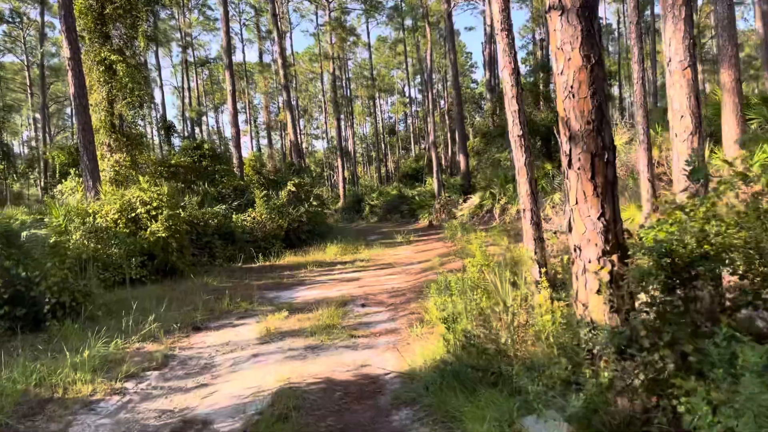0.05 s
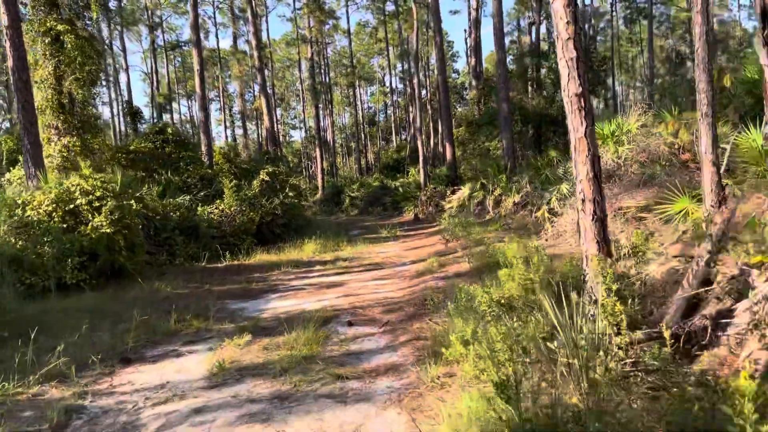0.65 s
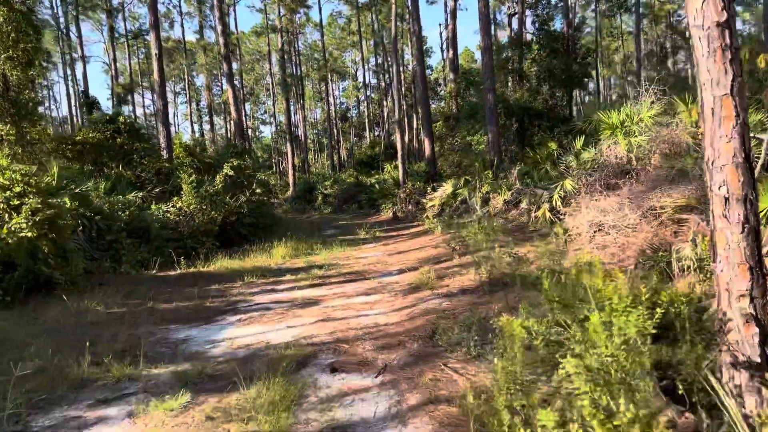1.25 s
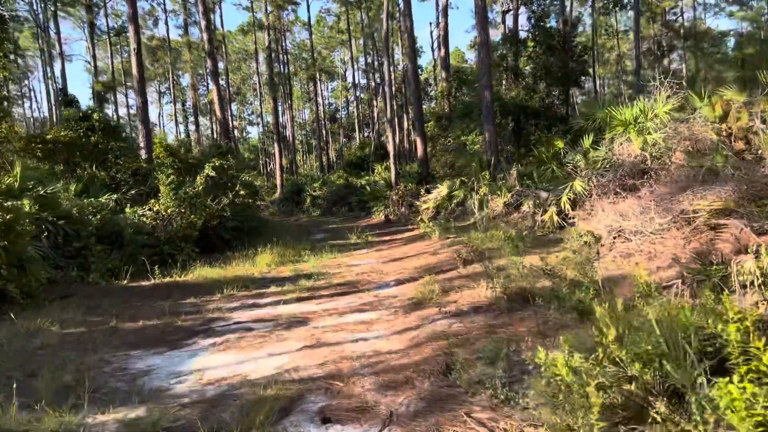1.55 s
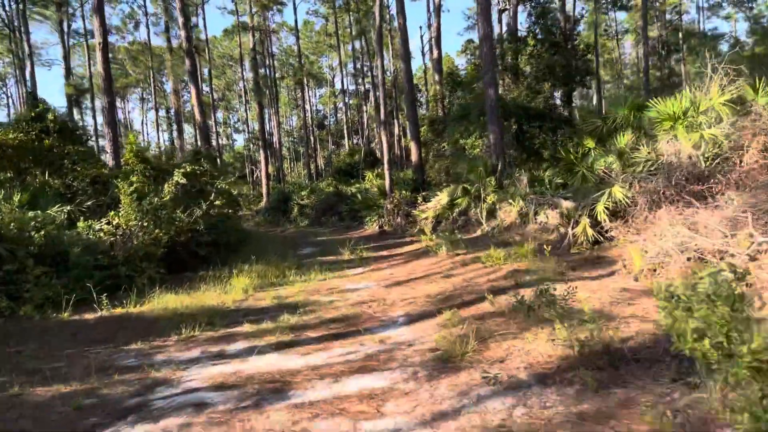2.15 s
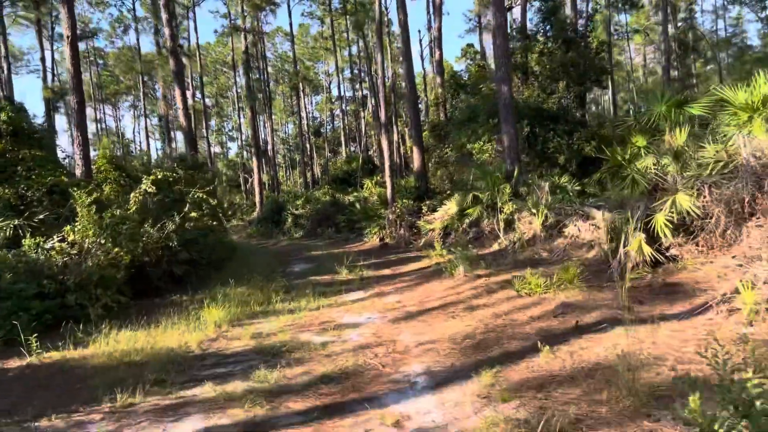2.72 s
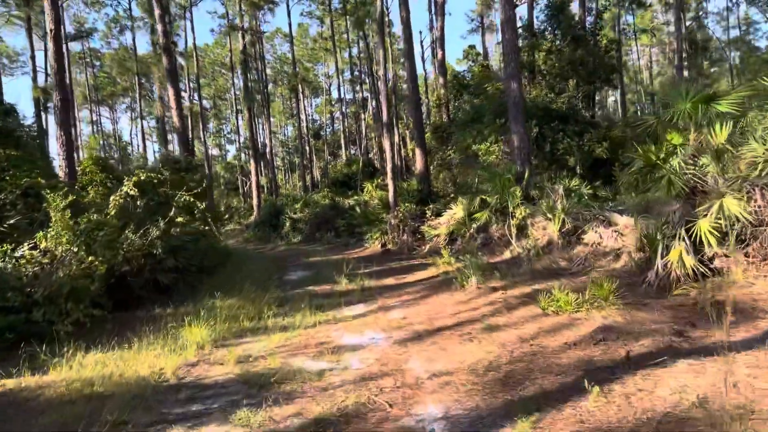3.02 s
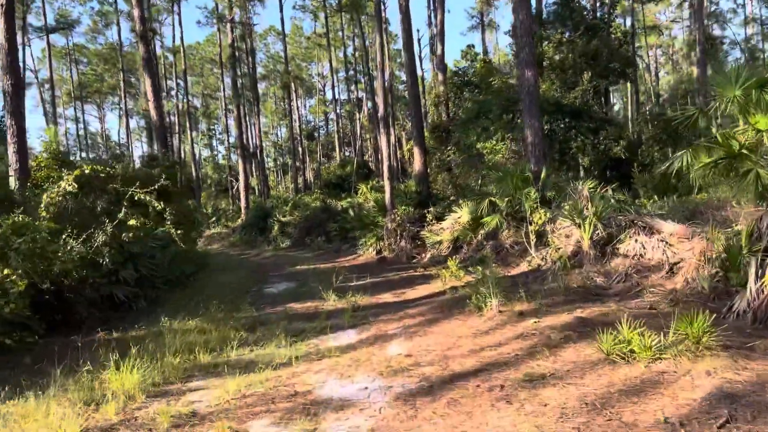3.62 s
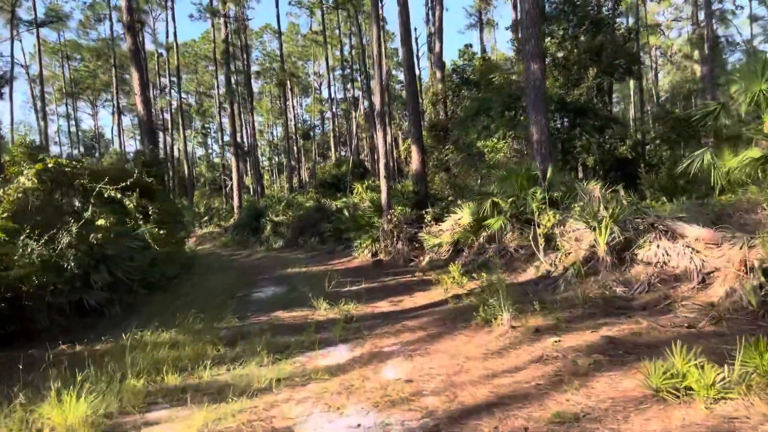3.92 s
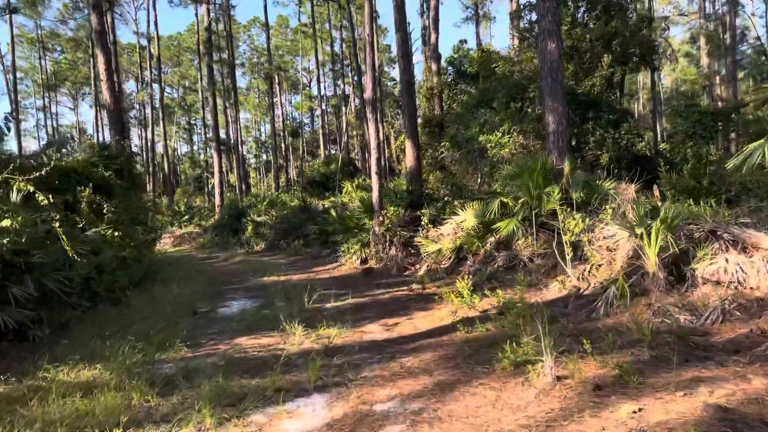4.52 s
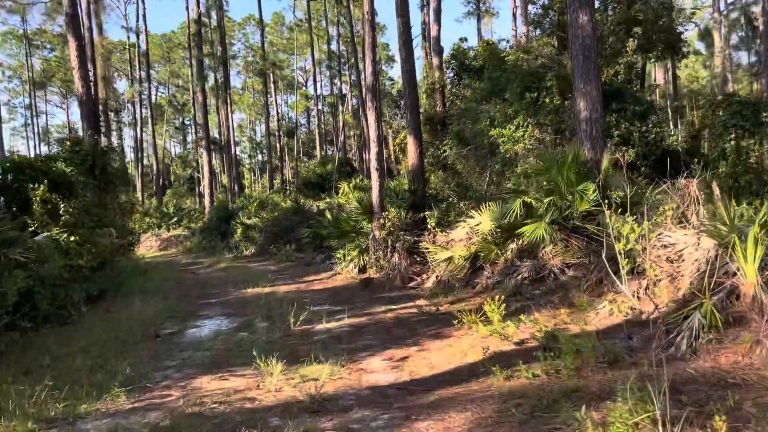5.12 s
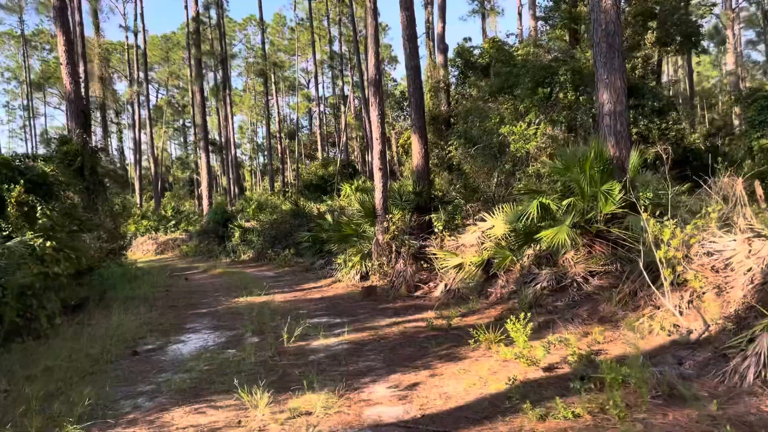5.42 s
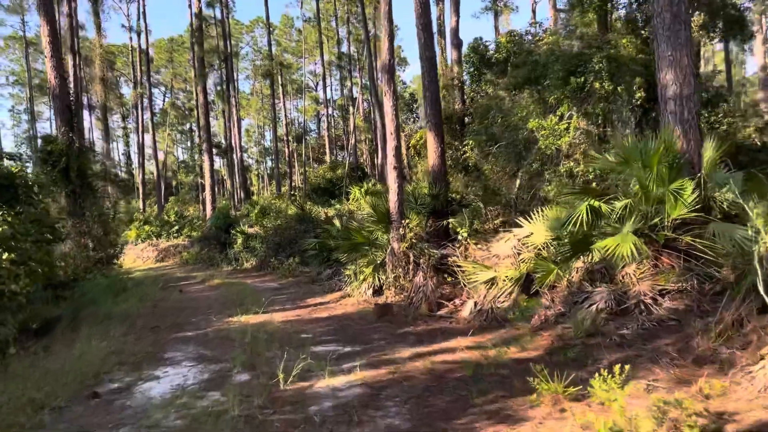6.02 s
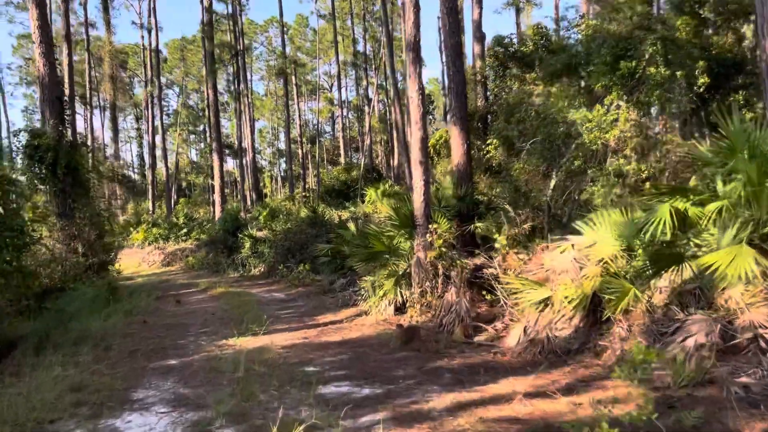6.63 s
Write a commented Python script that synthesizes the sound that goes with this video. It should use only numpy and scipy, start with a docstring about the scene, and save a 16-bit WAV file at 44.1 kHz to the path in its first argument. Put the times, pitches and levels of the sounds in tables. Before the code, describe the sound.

Low wind buffeting and tyres crunching on sand, as a light vehicle bumps along, a loose part scraping and clacking and twigs cracking.

```python
"""A light vehicle, probably a bicycle, rolls slowly along a sandy forest track, microphone on board.
From the start, air buffets the microphone and the tyres crunch over sand and pine needles.
Bumps thud through the frame; a loose part scrapes upward and drops back with a clack, again and again.
Twigs snap in the first second, then from 2.2 to 3.4 s amid more bumps, coarse grit and metal ticks.
From 4 to 6 s come the hardest bump and the hardest landings, which also thud; the ride then eases."""
import sys
import numpy as np
from scipy import signal
from scipy.fft import rfft, irfft
from scipy.io import wavfile
from scipy.ndimage import uniform_filter1d

SR = 44100
rng = np.random.default_rng(int(sys.argv[2]) if len(sys.argv) > 2 else 0)


def waveform_to_disk(signal):
    """Save audio, clipped to [-1, 1], as 16-bit WAV at the path in sys.argv[1]."""
    frames = np.transpose(np.atleast_2d(signal))
    scaled = np.clip(frames, -1, 1) * 32767
    samples = np.round(scaled).astype(np.int16)
    wavfile.write(sys.argv[1], SR, samples)


N = 302570
TIME_S = np.arange(N) / SR
FREQS_HZ = np.arange(N // 2 + 1) * SR / N
TOP_HZ = 15750

# Air on the microphone between jolts. Each row: time in seconds, level in dB.
AIR_LEVELS = [(0.0, -39.5), (0.42, -35.5), (0.61, -45), (0.94, -43), (1.49, -39.5), (1.9, -37),
              (2.27, -38.5), (2.67, -45), (3.55, -39), (4.1, -38.5), (4.89, -39), (5.2, -39), (5.37, -40),
              (6.04, -45.5), (6.42, -39.5), (6.86, -47)]
# Sand off the tread. Each row: time in seconds, level in dB.
SPRAY_LEVELS = [(0.0, -68), (0.57, -64.5), (0.8, -67.5), (2.14, -62.5), (2.33, -66.5), (2.81, -67),
                (3.17, -69.5), (3.78, -71), (3.95, -69), (4.62, -67.5), (5.24, -70.5), (6.48, -67.5),
                (6.86, -64)]
# Ground under the tyres. Each row: time in seconds, roll level in dB, grit level in dB.
GROUND_LEVELS = [(0.0, -45.5, -52.5), (0.63, -45.5, -54), (1.45, -43.5, -47.5), (1.62, -45, -55),
                 (1.95, -43, -53.5), (2.44, -44.5, -50.5), (2.77, -42, -44.5), (3.13, -43.5, -52),
                 (3.88, -44, -51), (4.51, -43, -47.5), (5.44, -44.5, -54), (5.73, -43.5, -47.5),
                 (6.31, -45.5, -48.5), (6.86, -47, -50)]
# Patches on the track. Each row: centre in seconds, level in dB, length in seconds.
NEEDLE_PATCHES = [(0.48, -56.5, 0.11), (0.645, -54.5, 0.22), (1.229, -52, 0.12), (1.36, -58, 0.23),
                  (1.512, -62, 0.051), (1.685, -54, 0.081), (1.93, -52, 0.18), (2.263, -53, 0.066),
                  (2.335, -49, 0.028), (2.469, -51.5, 0.026), (3.515, -52.5, 0.042), (3.672, -54, 0.26),
                  (3.835, -55.5, 0.2), (3.956, -51, 0.022), (4.317, -61.5, 0.037), (6.61, -53.5, 0.084),
                  (6.689, -47, 0.03), (6.826, -44.5, 0.023)]
GRIT_PATCHES = [(1.28, -46, 0.12), (1.5, -51, 0.26), (1.906, -49, 0.097), (2.591, -40.5, 0.058),
                (2.675, -45, 0.12), (2.795, -46, 0.054), (2.904, -44.5, 0.049), (3.10, -42, 0.13),
                (3.305, -45, 0.12), (3.38, -47, 0.057), (3.443, -47, 0.035), (3.624, -46.5, 0.035),
                (3.788, -45.5, 0.043), (4.054, -44.5, 0.039), (4.919, -40, 0.027), (6.601, -42, 0.035)]
# Small contacts. Each row: start in seconds, level in dB.
DRY_CLICKS = [(0.5045, -37), (2.983, -38), (2.992, -22), (3.022, -37.5), (3.36, -40), (3.903, -39),
              (4.046, -32.5), (4.783, -34.5), (4.805, -30), (5.422, -29), (5.487, -35), (5.671, -51),
              (5.796, -32), (5.879, -27), (5.917, -34), (5.951, -36)]
METAL_TICKS = [(2.11, -21), (2.69, -32.5), (2.77, -30.5), (2.844, -31), (2.863, -27), (2.874, -26.5),
               (3.062, -37), (3.359, -34.5), (3.643, -50), (3.666, -38), (3.694, -28.5), (4.12, -30.5),
               (4.706, -29), (5.349, -34), (5.506, -22), (5.636, -31), (5.972, -34), (6.086, -35.5),
               (6.274, -35.5), (6.686, -44)]
# Twigs and cones breaking. Each row: start in seconds, level in dB, pitch in Hz, decay in cycles.
TWIG_SNAPS = [(0.147, -30, 1120, 4.8), (0.588, -19, 1130, 1.3), (0.686, -28, 785, 2.8),
              (2.242, -23.5, 1180, 2.2), (2.522, -35, 925, 2), (2.55, -25, 1220, 1.5),
              (2.757, -25, 1000, 1), (2.961, -22, 890, 1.5), (2.988, -20, 1190, 2.9),
              (3.244, -23.5, 1230, 2.6), (3.408, -26, 1230, 2.2), (3.427, -16.5, 1470, 2.3)]
# Thuds in the frame, from bumps and from the loose part's hardest landings.
# Each row: start in seconds, level in dB, pitch in Hz, knock offset in dB.
FRAME_THUDS = [(0.101, -19.5, 112, -3), (0.259, -29, 102, -7), (0.304, -21.5, 190, -12),
               (0.48, -27.5, 175, -19), (0.509, -13.5, 147, -6), (0.546, -19.5, 94, -4),
               (1.997, -18.5, 122, -27), (2.078, -19.5, 119, -19), (2.181, -21.5, 157, -7),
               (2.277, -28, 109, -12), (2.404, -24, 95, -7), (2.487, -23, 58.7, -32),
               (2.67, -27.5, 80, -3.5), (2.708, -25.5, 171, -20), (2.831, -14, 117, -15),
               (2.852, -24.5, 115, -29), (2.895, -25, 180, -16), (4.173, -21.5, 184, 0),
               (4.246, -18.5, 97, -7), (4.31, -19.5, 108, -22), (4.467, -16, 94, -1.5),
               (4.576, -17, 109, -28), (4.688, -22, 101, -15), (4.86, -21, 320, -20),
               (5.166, -23.5, 119, -14), (5.371, -18.5, 127, -25), (5.512, -9, 114, -18.5),
               (5.533, -21, 249, -6), (5.56, -25, 130, -12), (5.589, -17.5, 131, -16),
               (5.706, -26.5, 170, -5), (5.725, -20.5, 430, -2), (5.747, -20, 95, -14),
               (5.789, -22, 78.5, -24), (6.51, -22, 89.5, -20)]
# Hops of the loose part. Each row: start in seconds, scrape in dB, flight in seconds, clack in dB.
PART_HOPS = [(0.338, -31, 0.019, -43.5), (0.831, -25.5, 0.019, -40.5), (0.971, -25, 0.02, -34.5),
             (2.109, -33.5, 0.023, -42), (2.523, -28.5, 0.023, -40.5), (2.625, -34.5, 0.017, -47),
             (2.770, -27.5, 0.016, -43), (2.969, -33, 0.017, -32.5), (3.234, -31, 0.017, -38.5),
             (3.399, -31.5, 0.016, -41), (3.556, -35.5, 0.017, -41), (4.205, -26, 0.019, -31.5),
             (4.497, -28.5, 0.028, -39.5), (4.627, -31, 0.017, -47), (4.8184, -20.5, 0.025, -19.5),
             (4.911, -35, 0.024, -52), (4.9583, -25.5, 0.023, -31), (5.1056, -22.5, 0.021, -31.5),
             (5.199, -33, 0.023, -43), (5.3867, -21.5, 0.023, -31.5), (5.5247, -20, 0.017, -31.5),
             (5.6988, -21, 0.026, -24.5), (5.766, -30, 0.02, -49), (5.851, -21.5, 0.029, -29),
             (6.002, -25.5, 0.021, -52), (6.138, -27.5, 0.019, -54), (6.304, -26, 0.017, -39),
             (6.454, -32, 0.017, -40.5)]

# Noise spectra. Each row: frequency in Hz, relative density in dB.
WIND_SPECTRUM = [(22, -29), (40, -4.5), (65, 2), (120, 2), (200, -7), (300, -17.5), (600, -32), (1500, -44)]
SAND_SPECTRUM = [(1500, -4), (2500, 0.5), (4000, -2), (6000, 0.5), (8000, 3), (10000, 1), (12500, -11),
                 (14000, -1.5), (15500, 10)]
NEEDLE_SPECTRUM = [(2000, -3), (4000, -6.5), (6000, 2), (8000, 2.5), (10000, 5), (12500, -2), (14000, -4),
                   (15500, -20)]
ROLL_SPECTRUM = [(120, -7), (250, -5.5), (380, 1.5), (550, -6.5), (800, -7.5), (1200, -18.5), (2500, -26)]
GRIT_SPECTRUM = [(500, -3.5), (900, -1), (1300, 1.5), (2000, -10), (3000, -16.5), (5000, -20.5)]
DRY_CLICK_SPECTRUM = [(600, -59), (1400, -7), (2500, 3), (3800, 8.5), (5500, 1), (8000, -7), (14000, -37)]
TICK_SPECTRUM = [(2000, -4.5), (4500, -4), (6500, 3.5), (8000, -13), (10000, 1), (12500, -2.5),
                 (15500, -12)]
CRACK_SPECTRUM = [(300, 3), (900, 2), (2000, -5), (4000, -27), (10000, -42)]
KNOCK_SPECTRUM = [(100, -7), (220, 4.5), (380, -1), (520, -1.5), (800, -37), (2000, -65)]
RASP_SPECTRUM = [(500, 7.5), (900, 5), (1400, -3.5), (1800, 5.5), (2400, -2), (3300, -0.5), (4200, 8),
                 (5100, -5.5), (6500, -3.5), (7400, -11.5), (9000, -75), (12000, -33)]
EDGE_SPECTRUM = [(3000, -18), (6500, 10), (9500, 2), (11500, -9.5), (13000, -16), (15500, -19)]
CLACK_SPECTRUM = [(300, -7), (450, 7.5), (650, -2.5), (870, -2), (1200, 5.5), (1600, -14.5), (3000, -15)]
CONTACT_SPECTRUM = [(1000, -22), (1600, -10), (2200, -2.5), (3700, 9), (5000, -0.5), (6500, 4.5),
                    (9000, -16), (12000, -16), (15000, -38)]

# Resonances. Each row: frequency in Hz, bandwidth in Hz, relative level in dB.
METAL_MODES = [(2240, 14, -10.5), (2530, 24, -14), (2740, 21, -14), (3080, 28, -6.5), (4310, 60, -12),
               (5130, 58, -4), (5370, 60, -4), (9320, 140, 6.5), (11150, 71, -6.5)]
FRAME_MODES = [(179.2, 18, -0.5), (246, 44, -5)]
LOOSE_PART_MODES = [(1786, 40, 17.5), (2890, 240, 11.5), (3700, 680, -3), (4160, 200, -2), (5460, 370, 7.5)]
HOLLOW_SEAT_MODES = [(318, 21, -15), (492, 52, -16), (652, 22, -8.5), (782, 17, -2), (874, 28.4, 1),
                     (1075, 67, 3), (1234, 64, -4), (1746, 50, 1)]

# Phase between the microphone ports. Each row: frequency in Hz, lead of the left port in radians.
PORT_LEAD = [(0, 0), (700, .4), (2000, .1), (5000, .3), (6300, -.4), (7200, -1.7), (7800, -3.05),
             (8900, -3.25), (10000, -5.1), (11000, -6.2), (12700, -6.5), (14000, -9.35), (16000, -9.45)]

MID_CONTACT_DB = -27  # harder scrapes and clacks are brighter, softer ones duller


def undb(db):
    """Decibels to gain."""
    return 10 ** (np.asarray(db) / 20)


def unit(x):
    """Scale to rms 1."""
    return x / np.sqrt(np.mean(x ** 2))


def pan(x, left_db):
    """Lean a sound to the left."""
    return x * undb(np.array([[left_db], [-left_db]]) / 2)


def add(track, start_s, sound):
    """Mix a short sound into a track."""
    start = max(int(start_s * SR), 0)
    part = sound[..., :N - start]
    track[..., start:start + part.shape[-1]] += part


def fade(t, rise_s, decay_s):
    """Contact envelope, zero before onset."""
    t = np.maximum(t, 0)
    return (1 - np.exp(-t / rise_s)) * np.exp(-t / decay_s)


def curves(rows):
    """Level columns, linearly interpolated over time."""
    s, *columns = np.transpose(rows)
    return [np.interp(TIME_S, s, column) for column in columns]


def swells(rows):
    """One smooth rise and fall of gain per patch."""
    gain = np.zeros(N)
    for centre_s, db, length_s in rows:
        add(gain, centre_s - length_s / 2, undb(db) * np.hanning(int(length_s * SR)))
    return gain


def wander(rate_hz):
    """Random steps, smoothed twice; rms 1."""
    hold = int(SR / rate_hz)
    steps = np.repeat(rng.standard_normal(N // hold + 1), hold)
    return unit(uniform_filter1d(uniform_filter1d(steps, hold), hold)[:N])


def stereo_noise(side_db, size=N):
    """Noise at two ports: a shared part plus a difference."""
    mid, side = rng.standard_normal((2, size))
    return unit(np.array([mid + undb(side_db) * side, mid - undb(side_db) * side]))


def colour(x, spectrum, skirt_db_per_oct=24, size=2048):
    """Minimum-phase filter of unit energy; falls off beyond the spectrum's ends."""
    hz, db = np.transpose(spectrum)
    octave, known = np.log2(np.arange(size + 1) * SR / (2 * size) + 1), np.log2(hz)
    beyond_oct = np.abs(octave - np.clip(octave, known[0], known[-1]))
    gain_db = np.interp(octave, known, db) - skirt_db_per_oct * np.minimum(beyond_oct, 2)
    cepstrum = irfft(np.log(undb(gain_db)))
    cepstrum[1:size] *= 2
    cepstrum[size + 1:] = 0
    response = irfft(np.exp(rfft(cepstrum)))[:size]
    return signal.oaconvolve(x, response[None] / np.linalg.norm(response), axes=1)[:, :N]


def damped_sine(t, hz, width_hz):
    """Free decay of one mode."""
    return np.exp(-np.pi * width_hz * t) * np.sin(2 * np.pi * hz * t)


def resonate(x, modes, size=4096):
    """Drive resonances of unit total energy."""
    t = TIME_S[:size]
    response = sum(undb(db) * width_hz * damped_sine(t, hz, width_hz) for hz, width_hz, db in modes)
    return signal.fftconvolve(x, response[None] / np.linalg.norm(response))[:, :N]


def struck(rows, modes, vary_db, detune, size=8192):
    """Blows at (s, dB) ring the modes; each lands on another spot, shifting pitch and balance."""
    track, t = np.zeros(N), TIME_S[:size]
    hz, width_hz, mode_db = np.transpose(modes)[:, :, None]
    for (s, db), (loud, sharp) in zip(rows, rng.standard_normal((len(rows), 2, len(modes), 1))):
        partials = damped_sine(t, hz * (1 + detune * sharp), width_hz)
        add(track, s, np.sum(undb(db + mode_db + vary_db * loud) * partials, axis=0))
    return track


def grains(rate_hz, spread_db, side_db):
    """Dense tiny fractures, most weak, a few strong."""
    sizes = undb(spread_db * np.minimum(rng.exponential(size=N), 5))
    return unit(stereo_noise(side_db) * sizes * (rng.random(N) < rate_hz / SR))


def strays(rate_hz, db, spread_db, count=40):
    """Contacts at random times, as rows (s, dB)."""
    wait, force = rng.random((count, 2)).T
    s = np.cumsum(-np.log(1 - wait)) / rate_hz
    return np.c_[s, db + spread_db * (2 * force - 1)][s < TIME_S[-1]]


def taps(rows, decay_s, side_db, size=2048):
    """Single rough contacts at (s, dB)."""
    envelope = np.zeros(N)
    for s, db in rows:
        add(envelope, s - .001, undb(db) * fade(TIME_S[:size], 0.00098, decay_s))
    return envelope * stereo_noise(side_db)


def chatter(rows, lead_s, gap_s, first, decay_s, tail, tail_s, side_db, size=4096):
    """Double contacts at (s, dB), then a shiver; first and tail are gains against the second touch."""
    track, t = np.zeros((2, N)), TIME_S[:size]
    for (s, db), late in zip(rows, rng.standard_normal(len(rows))):
        second_s = gap_s * np.exp(0.09 * late)
        shape = first * fade(t, decay_s / 2, decay_s) + fade(t - second_s, decay_s / 2, decay_s)
        shape += tail * fade(t, gap_s, tail_s)
        add(track, s - lead_s, undb(db) * shape / shape.max() * stereo_noise(side_db, size))
    return track


def landings():
    """Falls of the loose part, as rows (s, dB)."""
    start_s, _, flight_s, clack_db = np.transpose(PART_HOPS)
    return np.c_[start_s + flight_s, clack_db]


def gusts(rows, rise_s=0.012, decay_s=0.023, size=10000):
    """Gain of the gusts stirred as jolts at (s, dB) shake the microphone."""
    gain = np.zeros(N)
    for s, db in rows:
        add(gain, s, undb(db) * fade(TIME_S[:size], rise_s, decay_s))
    return gain


def wind(level_db):
    """Eddies shed at the microphone: uneven puffs, harder after each thud or clack."""
    puffs = undb(2.33 * wander(32))
    jolts = undb(-6) * gusts(np.array(FRAME_THUDS)[:, :2]) + undb(-7) * gusts(landings())
    rumble = unit(colour(stereo_noise(-2.2), WIND_SPECTRUM) * puffs)
    return rumble * np.hypot(undb(level_db + 6.5), jolts)


def sand(level_db, edges_hz=(1500, 4500, 6200, 8000, 10800, TOP_HZ)):
    """Sand sprays off the tread, each grain size in its own flickering band."""
    spray = 0
    for band_hz in zip(edges_hz, edges_hz[1:]):
        band = signal.butter(3, band_hz, "band", fs=SR, output="sos")
        flicker = undb(2.6 * wander(70))
        spray += signal.sosfilt(band, grains(4000, spread_db=1.5, side_db=-42)) * flicker
    return unit(colour(spray, SAND_SPECTRUM)) * undb(level_db + 5.5 + 3.6 * wander(28))


def needles(level_db, low_hz=3000, width_hz=240, count=15000, size=192):
    """Dry needles snap; their tiny pings merge into a swish, strongest in the patches."""
    track = np.zeros(N)
    when, pitch, force = rng.random((count, 3)).T
    pitches_hz = low_hz + pitch * (TOP_HZ - low_hz)
    gains = undb(np.minimum(-np.log(1 - force), 4))
    for s, hz, gain in zip(when * TIME_S[-1], pitches_hz, gains):
        add(track, s, gain * damped_sine(TIME_S[:size], hz, width_hz))
    swish = colour(unit(track)[None] * undb(3.6 * wander(110)), NEEDLE_SPECTRUM)
    return swish * np.hypot(undb(-0.5) * swells(NEEDLE_PATCHES), undb(level_db + 3.0))


def tyres(roll_db, grit_db):
    """The tread rolls on soft ground and crushes grit in spurts, coarser in the patches."""
    roll = colour(grains(5000, spread_db=2.47, side_db=-5.5), ROLL_SPECTRUM)
    roll *= undb(roll_db + 2.5 + 1.77 * wander(30))
    crunch = colour(grains(3500, spread_db=1.4, side_db=-3.5), GRIT_SPECTRUM)
    crunch *= undb(grit_db - 0.77 + 2.8 * wander(70))
    grind = colour(grains(1100, spread_db=0.67, side_db=-9.5), GRIT_SPECTRUM) * swells(GRIT_PATCHES)
    return pan(roll, -1.4) + pan(crunch + undb(0.5) * grind, 0.2)


def dry_clicks():
    """Small dry clicks: stones on the frame, and the loose part touching down and rebounding."""
    rows = [*DRY_CLICKS, *strays(rate_hz=1, db=-42.5, spread_db=2.8)]
    touch = taps(rows, decay_s=0.0028, side_db=-9)
    return pan(undb(-1.5) * colour(touch, DRY_CLICK_SPECTRUM), 3.6)


def ticks():
    """Light metal parts touch: a bright click and a thin jingle."""
    rows = [*METAL_TICKS, *strays(rate_hz=1, db=-39, spread_db=3.1)]
    click = colour(taps(rows, decay_s=0.0095, side_db=-1.5), TICK_SPECTRUM)
    jingle = struck(rows, METAL_MODES, vary_db=0, detune=0.0047)
    return undb(-13) * jingle + undb(-11.5) * click


def twigs(size=2048):
    """Dry wood breaks: a crack and a few cycles of its own pitch."""
    tone, crack, t = np.zeros(N), np.zeros(N), TIME_S[:size]
    for s, db, hz, cycles in TWIG_SNAPS:
        add(tone, s, undb(db) * fade(t, .5 / hz, cycles / hz) * np.sin(2 * np.pi * hz * t))
        add(crack, s, undb(db) * fade(t, rise_s=0.0001, decay_s=0.0026))
    return undb(-5.0) * tone + undb(-10.5) * colour(crack * stereo_noise(-10), CRACK_SPECTRUM)


def thuds(decay_cycles=0.86, lead_s=0.0026, size=6000):
    """Bumps and the loose part's hardest landings knock and swing the frame and shake the microphone."""
    swing, shake, impact = np.zeros((3, N))
    t = TIME_S[:size]
    for s, db, hz, knock_db in FRAME_THUDS:
        shape = fade(t, 2 * decay_cycles / hz, decay_cycles / hz)
        shape = undb(db) * shape / shape.max()
        add(swing, s - lead_s, shape * np.sin(2 * np.pi * hz * t))
        add(shake, s - lead_s, shape)
        add(impact, s, undb(db + knock_db) * fade(t, rise_s=0.0024, decay_s=0.011))
    frame = struck(np.array(FRAME_THUDS)[:, :2] + [.003, 0], FRAME_MODES, vary_db=-2.5, detune=0.08)
    shudder = shake * colour(stereo_noise(-7), WIND_SPECTRUM)
    knock = colour(impact * stereo_noise(-6), KNOCK_SPECTRUM)
    return undb(-4.0) * swing + undb(-9.5) * frame + undb(-14) * shudder + undb(-2) * knock


def scrapes():
    """The loose part slips upward: a sharp edge, then a bright rasp that rings its modes."""
    s, db, _, _ = np.transpose(PART_HOPS)
    edge_db = -25.5 + (db - MID_CONTACT_DB)
    rub = chatter(np.c_[s, db], lead_s=0.001102, gap_s=0.004,
                  first=0.66, decay_s=0.0025, tail=0.2, tail_s=0.015, side_db=-2.0)
    strike = chatter(np.c_[s, db - 12.5], lead_s=0.0016, gap_s=0.00715,
                     first=1.0, decay_s=0.0012, tail=0.1, tail_s=0.032, side_db=-2.0)
    edge = chatter(np.c_[s, db + edge_db], lead_s=0.0016, gap_s=0.0062,
                   first=3.5, decay_s=0.0036, tail=0.15, tail_s=0.008, side_db=-44)
    rasp = undb(-4.0) * colour(rub, RASP_SPECTRUM) + undb(2.5) * resonate(strike, LOOSE_PART_MODES)
    return pan(rasp, 4.1) + undb(12.5) * colour(edge, EDGE_SPECTRUM)


def clacks(right_lag_s=0.00023):
    """The part lands on its hollow seat, low on the left; the knock reaches the right port later."""
    s, db = landings().T
    contact_db = -6.5 + 0.68 * (db - MID_CONTACT_DB)
    knock_db = -2 - 0.59 * (db - MID_CONTACT_DB)
    blow = chatter(np.c_[s, db], lead_s=0.001053, gap_s=0.0068,
                   first=1.0, decay_s=0.0029, tail=0.67, tail_s=0.013, side_db=-5.5)
    contact = chatter(np.c_[s, db + contact_db], lead_s=0.0004, gap_s=0.0067,
                      first=1.5, decay_s=0.0024, tail=0.26, tail_s=0.011, side_db=-13)
    jolt = chatter(np.c_[s, db + knock_db], lead_s=0.0019, gap_s=0.007,
                   first=0.77, decay_s=0.002, tail=1.0, tail_s=0.031, side_db=-3.5)
    seat = struck(np.c_[s + .003, db], HOLLOW_SEAT_MODES, vary_db=2.0, detune=0.012)
    knock = colour(jolt, KNOCK_SPECTRUM)
    left, right = undb(1.0) * colour(blow, CLACK_SPECTRUM) + undb(-2.9) * seat + undb(-0.5) * knock
    body = np.array([left, np.interp(TIME_S - right_lag_s, TIME_S, right)])
    return pan(body + undb(1.0) * colour(contact, CONTACT_SPECTRUM), 3.6)


def scene():
    """All sources ride with the microphone; the open wood gives no echo."""
    air_db, = curves(AIR_LEVELS)
    spray_db, = curves(SPRAY_LEVELS)
    rolling = wind(air_db) + tyres(*curves(GROUND_LEVELS))
    hiss = pan(sand(spray_db) + needles(spray_db), 0.39)
    return rolling + hiss + thuds() + scrapes() + clacks() + twigs() + dry_clicks() + ticks()


def record(dry, mono_below_hz=90):
    """Two close ports: deep bass alike, treble shifted in phase, top cut."""
    lead_rad = np.interp(FREQS_HZ, *np.transpose(PORT_LEAD))
    left, right = dry[0], irfft(rfft(dry[1]) * np.exp(-1j * lead_rad), N)
    mid = (left + right) / 2
    side = irfft(rfft(left - right) / 2 * FREQS_HZ / np.hypot(FREQS_HZ, mono_below_hz), N)
    lowpass = signal.ellip(10, .2, 70, TOP_HZ, fs=SR, output="sos")
    return signal.sosfilt(lowpass, [mid + side, mid - side])


dry = scene()
out = record(dry)
waveform_to_disk(out)
```